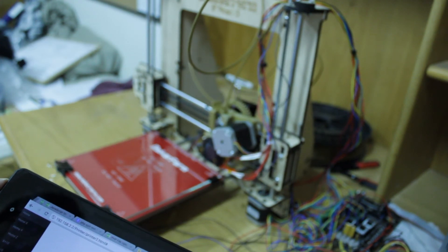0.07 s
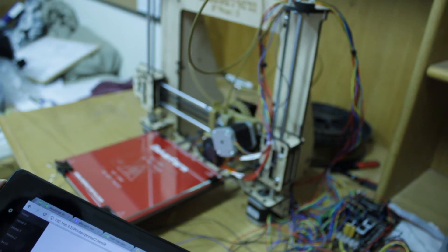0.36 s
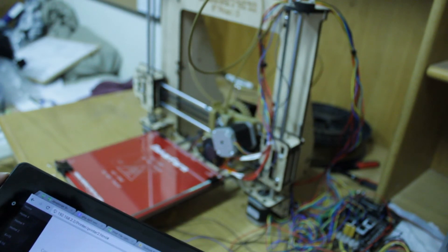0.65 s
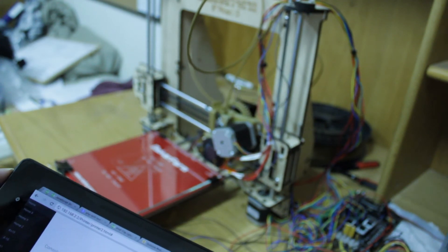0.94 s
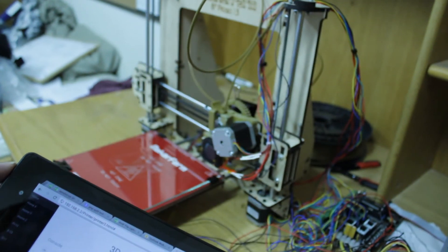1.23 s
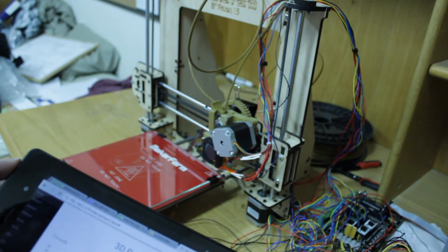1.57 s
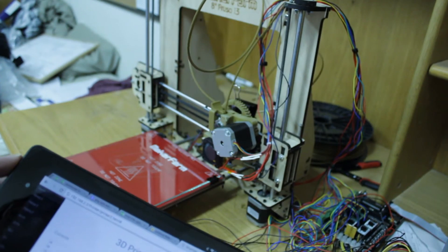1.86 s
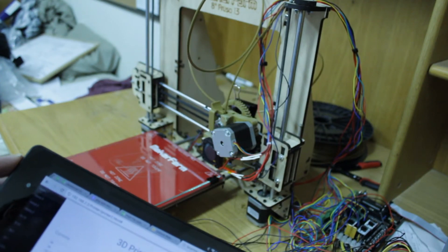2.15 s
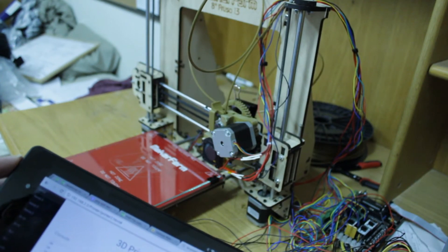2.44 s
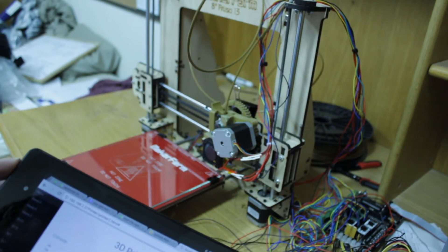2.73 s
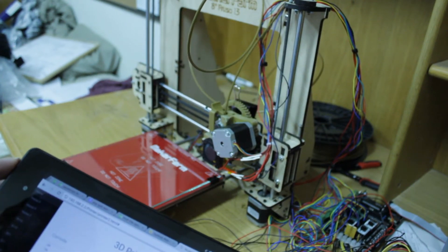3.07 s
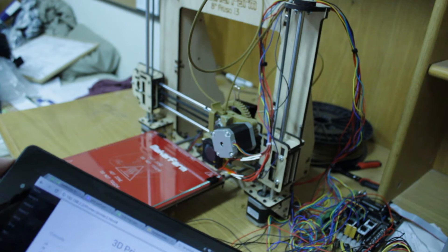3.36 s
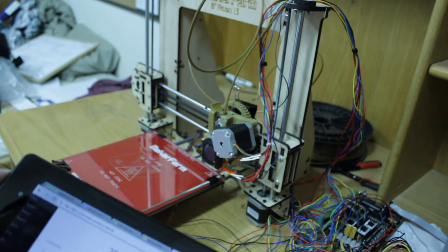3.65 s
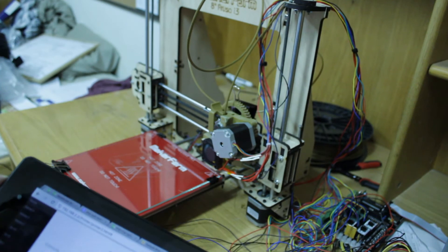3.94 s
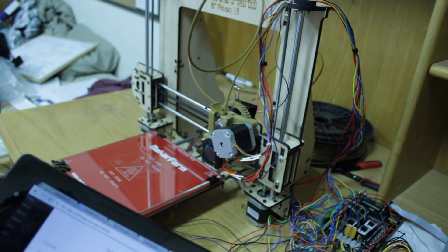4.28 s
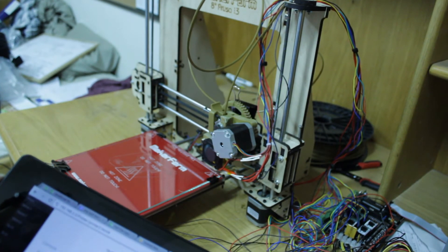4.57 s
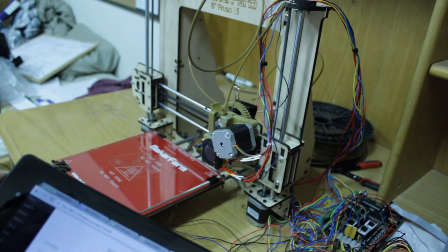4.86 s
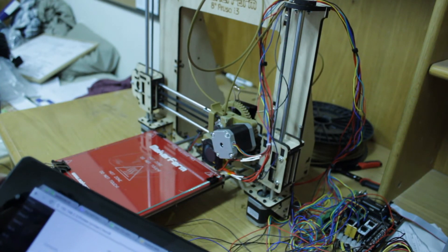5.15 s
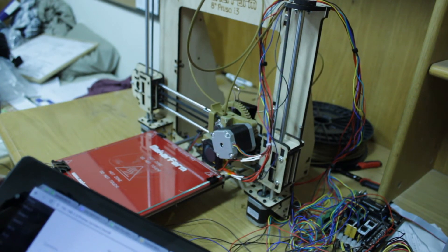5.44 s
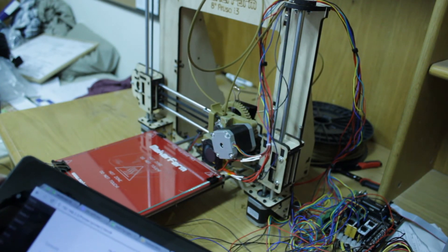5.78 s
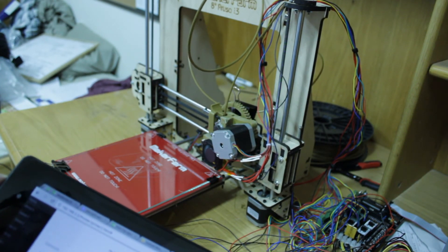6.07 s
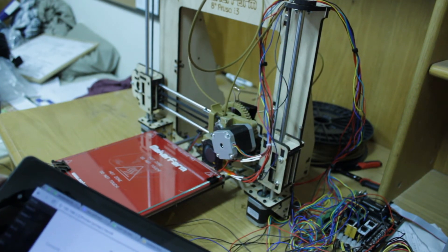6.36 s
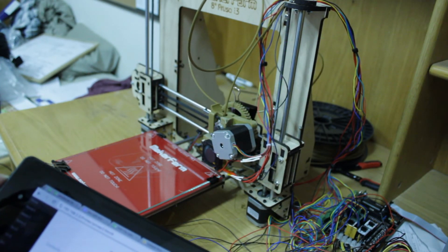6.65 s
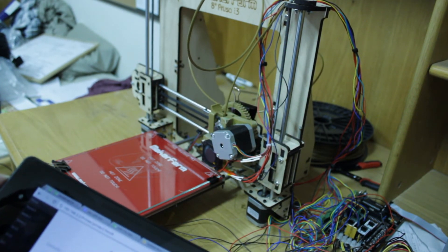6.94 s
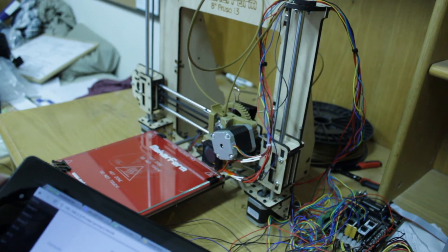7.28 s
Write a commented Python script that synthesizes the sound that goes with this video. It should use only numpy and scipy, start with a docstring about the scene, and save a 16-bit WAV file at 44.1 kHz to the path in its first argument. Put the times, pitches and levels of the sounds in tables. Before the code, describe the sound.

A small 3D printer runs on a desk in a still room, at arm's length from the microphone. Its stepper motor whines at one unchanging pitch, rich in overtones, with a soft rumble of bearings beneath. A little cooling fan adds a high, pulsing chirr. About a second in come a few light ticks, a small knock and brief scuffs. Faint hum and thin electrical hiss lie behind it all.

```python
"""A small 3D printer on a desk in a still room, at arm's length from one microphone.
Its stepper motor drives the bed at one even speed and whines through the wooden frame.
Bearings rumble along the rods, and a little cooling fan rubs once a turn and chirrs.
A few light ticks and short scuffs sound as the bed travels.
Behind it all lie room air, a low hum and a thin, buzzing electrical hiss."""
import sys
import numpy as np
from scipy.fft import rfft, irfft, next_fast_len
from scipy.io import wavfile
from scipy.ndimage import uniform_filter1d, map_coordinates

SR = 44100
rng = np.random.default_rng(int(sys.argv[2]) if len(sys.argv) > 2 else 0)


def transcribe(signal):
    """Save signal, clipped to [-1, 1], as a 16-bit WAV file at the path in sys.argv[1]."""
    frames = np.atleast_2d(signal).T
    limited = np.clip(frames, -1, 1)
    pcm = np.round(limited * 32767).astype(np.int16)
    wavfile.write(sys.argv[1], SR, pcm)


N = 322371

STEP_HZ, FAN_HZ, BUZZ_HZ, TOP_HZ = 208.01, 105.78, 48.01, 15730

# the rods run a little rougher at first: t/s, relative level/dB
ROD_DRAG = [(0, 1), (1.5, -0.5), (7.31, -0.94)]
# the thin treble: t/s, relative level of the coil sizzle/dB, level of the whistling hiss/dB
TREBLE_LEVELS = [(0, -64, -65), (.35, -72, -67), (.8, -70, -67), (1.1, -61, -70), (2.6, -62, -78),
                 (3.2, -64, -68), (3.9, -63, -65), (5.5, -63, -63.5), (7.31, -64, -63.5)]


def stepper():
    """Evenly timed steps jerk the rotor: low orders make one push a step, high ones flutter with load."""
    # overtones of the whine: multiple of the step rate, relative level/dB
    step_orders = [(3, -9.5), (4, -18.5), (5, -17), (6, -27.5), (7, -25.5), (8, -32.5), (9, -30.5),
                   (10, -30), (11, -35.5), (12, -36), (13, -42), (14, -42), (15, -40.5), (16, -54),
                   (17, -54)]
    # the four steps of a coil cycle are unequal: multiple of the step rate, relative level/dB
    coil_orders = [(1 / 4, -63), (3 / 4, -58), (5 / 4, -55), (3 / 2, -43), (5 / 2, -57), (15 / 2, -63),
                   (21 / 2, -62)]
    # the load lifts the two lowest orders: base level/dB, start t/s, attack/s, hold/s, release/s
    first_swell = (-21.5, .325, .44, .425, .11)
    second_swell = (-26.4, .35, .17, .58, .23)
    # depth of that swell as the bed travels: t/s, first order/dB, second order/dB
    swell_depths = [(0, .8, 2.2), (.8, 1.7, 3.6), (1.7, 2.1, 4.6), (2.25, .4, 4.1), (2.53, 4.6, 6),
                    (2.75, .8, 1.9), (3.4, 1.4, 4.3), (3.95, 3.6, 2.3), (4.3, 1.6, 3), (4.9, 4.5, 2.3),
                    (6.05, 4.5, 3.1), (6.6, 6, 4.5), (7.31, 4.8, 1.4)]
    steps = STEP_HZ * clock() + 0.0015 * wobble(3.2)
    first_db, second_db = curves(swell_depths)
    drag_db, = curves(ROD_DRAG)
    lag = 0.08  # cycles by which the frame delays the overtones
    whine = pulley_load(first_swell, first_db) * tone(steps)
    whine += pulley_load(second_swell, second_db) * tone(2 * steps - lag)
    for order, db in step_orders:
        flutter_db = min(0.11 * order, 2.0) * unit(wobble(25) + 0.91 * wobble(2.96))
        phase = rng.random() * (order > 3)
        rough_db = (drag_db + 0.16) * (order > 5)
        whine += amp(db - 18.5 + flutter_db + rough_db) * tone(order * steps - lag + phase)
    uneven_db = -3.5 + .65 * clock()  # the uneven steps sound more as the bed travels
    for order, db in coil_orders:
        whine += amp(db + uneven_db + 0.89 * wobble(3.7)) * tone(order * steps + rng.random())
    return whine


def pulley_load(shape, depth_db):
    """Gain of a low step order: the load swells and slackens once a turn of the belt pulley."""
    level_db, start_s, attack, hold, release = shape
    turn_s, slack_share = 0.97, .3  # when slack, the whine sinks by this share of the depth
    since = (clock() - start_s) % turn_s
    swell = np.interp(since, np.cumsum([0, attack, hold, release]), [0, 1, 1, 0])
    swell = uniform_filter1d(swell, SR // 20)
    return amp(level_db + depth_db * (swell - slack_share) + .3 * wobble(7))


def bearings():
    """Balls roll along the rods, are shaken at each step and stir the frame."""
    # balls on the rods: f/Hz, density/(dB per Hz)
    rolling_spectrum = [(140, -95), (195, -61.5), (255, -66), (300, -55.5), (350, -62.5), (395, -62),
                        (520, -70.5), (1150, -72), (1400, -74), (2180, -78.5), (2650, -82), (4150, -81.5),
                        (6600, -94), (11000, -110)]
    # resonances of the wooden frame: f/Hz, width/Hz, gain/dB
    frame_modes = [(656, 13, 3), (737, 15, -3), (1520, 58, -0.5), (1856, 120, -4), (2145, 150, -0.5),
                   (4040, 160, -15)]
    drag_db, = curves(ROD_DRAG)
    shake = gate(STEP_HZ * clock(), sharpness=0.045)
    rolling = noise(rolling_spectrum) * shake
    rolling *= amp(.4 * drag_db + 0.52 * wobble(30) + 0.41 * wobble(4.12))
    return rolling + resonate(rolling, frame_modes)


def fan():
    """The bearing rubs once a turn and rings the housing; the coils switch four times a turn and sizzle."""
    # fan housing, lower and upper mode: f/Hz, width/Hz, gain/dB (evened out below)
    housing_modes = [(4583, 140, 13), (4767, 190, 0)]
    # its thin rim: f/Hz, width/Hz, relative gain/dB
    rim_modes = [(4960, 110, 0), (5190, 100, -4), (5700, 360, -4)]
    turns = FAN_HZ * clock() + .02 * wobble(1.5) + .002 * wobble(25)
    chirr_db = chirr_level()
    rub = unit(pulses(turns, scatter_db=1.2)) + .35 * rng.standard_normal(N)
    lower, upper = [unit(resonate(resonate(rub, [mode]), [mode])) for mode in housing_modes]
    swell = unit(chirr_db - uniform_filter1d(chirr_db, SR // 2))
    rising = unit(uniform_filter1d(np.gradient(chirr_db), SR // 10))
    balance = np.tanh(.6 * swell + .3 * rising)
    # the lower mode leads as a swell builds, the upper one as it fades
    chirr = (1 + .6 * balance) * lower - (1 - .25 * balance) * upper
    rim = resonate(resonate(rub, rim_modes), [(5000, 1200, 0)])
    rim *= amp(1.5 * swell + .7 * wobble(5))
    rim_db = -62 + .8 * clock()  # the rim rings more as the fan runs on
    switching = pulses(4 * turns, scatter_db=2)
    sizzle = resonate(switching, [(11840, 640, 15), (10800, 500, 11)])
    sizzle = resonate(sizzle, [(11300, 2700, 0)])
    sizzle_db, _ = curves(TREBLE_LEVELS)
    return amp(chirr_db) * unit(chirr) + amp(rim_db) * unit(rim) + amp(sizzle_db + 1.5) * unit(sizzle)


def chirr_level():
    """Level of the fan's chirr in dB: it swells and dips about three and a half times a second."""
    # rate of the swells: t/s, f/Hz
    swell_rates = [(0, 3.3), (1.1, 3.38), (1.3, 3.82), (2.1, 3.83), (3.1, 3.63), (4, 3.5), (5.5, 3.49),
                   (7.31, 3.38)]
    # the chirr at the top of a swell: t/s, level/dB
    crest_levels = [(0, -45), (.3, -43.9), (.95, -44.2), (1.5, -46.7), (2.3, -47.8), (3.02, -46.4),
                    (3.2, -52), (3.36, -46.5), (3.9, -48), (4.4, -46.5), (4.88, -48.5), (5.1, -45.8),
                    (5.35, -45.6), (5.8, -47.2), (6.35, -47.5), (6.75, -45.6), (6.95, -49.3), (7.15, -46.2)]
    swell_hz, = curves(swell_rates)
    crest_db, = curves(crest_levels)
    dip_db, flutter_db, brevity = 3.0, .7, 1.7
    cycles = np.cumsum(swell_hz) / SR
    dip = np.exp(-brevity * (1 + np.cos(2 * np.pi * cycles)))
    return crest_db - dip_db * dip + flutter_db * wobble(16)


def ticks():
    """Each contact is a brief bright crack, and a hard one also knocks the bed."""
    # light contacts: t/s, relative click level/dB, relative knock level/dB, bright band f/Hz, width/Hz
    contacts = [(.9692, -28, -50, 5200, 3000), (.9722, -22.5, -43, 6000, 7000),
                (1.008, -32, -12, 5500, 5000), (1.2545, -38, -76, 9400, 1000),
                (2.2395, -35, -70, 7700, 1100), (3.834, -34, -70, 2950, 120)]
    # what a click rings in the hard small parts: f/Hz, width/Hz, relative gain/dB
    part_modes = [(2420, 830, 11), (3900, 1200, 2), (5300, 630, 4), (7700, 1300, -10), (9600, 1000, -5),
                  (11300, 1100, 7), (13500, 1600, 4)]
    # what a knock rings in the bed: f/Hz, relative level/dB, t60/s
    bed_modes = [(563, 2.5, 0.034), (683, -20, 0.028), (790, -3, 0.032), (866, 1, 0.037),
                 (1010, 1.5, 0.022), (1255, 4, 0.015), (2170, -9, .03)]
    out, t = np.zeros(N), np.arange(SR // 5) / SR
    decay = amp(-60 * t / 0.0058) + 0.058 * amp(-60 * t / 0.088)  # a crack and a faint tail
    for s, click_db, knock_db, bright_hz, width_hz in contacts:
        blow = np.zeros(N)
        blow[:len(t)] = rng.standard_normal(len(t)) * decay
        click = resonate(resonate(blow, part_modes), [(bright_hz, width_hz, 0)])[:len(t)]
        click *= 7 / np.linalg.norm(click)
        knock = sum(amp(db - 60 * t / t60) * np.sin(2 * np.pi * (hz * t + rng.random()))
                    for hz, db, t60 in bed_modes)
        knock *= 0.35 * (1 - np.exp(-t / 0.00061))
        out[round(s * SR):][:len(t)] += amp(click_db) * click + amp(knock_db) * knock
    return out


def scuffs():
    """Something drags lightly on the moving bed, in small grains."""
    # short strokes: centre t/s, half-length/s, level/dB
    strokes = [(1.02, 0.029, -41), (1.21, .025, -44.5), (1.248, .03, -44), (1.3, 0.025, -43)]
    # colour of the friction: f/Hz, relative density/dB
    friction_spectrum = [(1000, -25), (3000, 2), (4300, 6), (5600, 2), (7000, -14), (9300, -7),
                         (11000, -21), (15000, -19)]
    envelope = sum(amp(db) * np.exp(-((clock() - s) / half_s) ** 2) for s, half_s, db in strokes)
    grains = noise(friction_spectrum) * amp(3 * wobble(300))
    return envelope * unit(grains)


def background():
    """The room tone under the printer: still air, hum and an electrical hiss that buzzes."""
    # mains and fan hum: f/Hz, level/dB
    hum_lines = [(59.5, -61.5), (105.9, -45.5), (120, -57), (317.5, -53), (952.4, -66), (1322, -83)]
    # electrical hiss: f/Hz, density/(dB per Hz)
    hiss_spectrum = [(5000, -125), (10000, -103), (12800, -90), (13300, -96), (13900, -91), (14400, -101),
                     (15700, -99)]
    # its narrow whistling bands: f/Hz, relative density/dB
    whistle_spectrum = [(13250, -30), (13440, -3), (13650, -22), (13880, 0), (14100, 0), (14350, -25)]
    # still room: f/Hz, density/(dB per Hz)
    air_spectrum = [(20, -92), (54, -75), (85, -97), (112, -65.5), (135, -76), (1000, -83), (7500, -93),
                    (9500, -95.5), (15500, -96.5)]
    hum = sum(amp(db + wobble(3.13)) * tone(hz * clock() + 0.063 * wobble(4.1) + rng.random())
              for hz, db in hum_lines)
    _, whistle_db = curves(TREBLE_LEVELS)
    hiss = noise(hiss_spectrum) + amp(whistle_db) * unit(noise(whistle_spectrum))
    return noise(air_spectrum) + hum + hiss * gate(BUZZ_HZ * clock(), sharpness=.4)


def amp(db):
    """Decibels to gain."""
    return 10 ** (np.asarray(db) / 20)


def unit(x):
    """Scale to rms 1."""
    return x / np.sqrt(np.mean(x ** 2) + 1e-20)


def clock():
    """The time of each sample."""
    return np.arange(N) / SR


def curves(rows):
    """One value per sample for each column after the time."""
    times, *columns = np.transpose(rows)
    return [np.interp(clock(), times, column) for column in columns]


def wobble(rate):
    """A smooth random curve, rate knots a second."""
    return map_coordinates(rng.standard_normal(int(N * rate / SR) + 4), [clock() * rate])


def filtered(x, response):
    """x times a complex response of frequency."""
    size = next_fast_len(N + SR // 2)
    return irfft(rfft(x, size) * response(np.fft.rfftfreq(size, 1 / SR)), size)[:N]


def noise(spectrum):
    """Noise shaped by rows of f/Hz, density/(dB per Hz)."""
    hz, db = np.transpose(spectrum)
    white = rng.standard_normal(N) * np.sqrt(SR / 2)
    return filtered(white, lambda f: amp(np.interp(np.log(f + 1), np.log(hz), db)))


def resonate(x, modes):
    """x through resonances given as f/Hz, width/Hz, gain/dB."""
    return filtered(x, lambda f: sum(amp(db) * 1j * f * width / (hz * hz - f * f + 1j * f * width)
                                     for hz, width, db in modes))


def tone(cycles):
    """A cosine of rms 1."""
    return np.sqrt(2) * np.cos(2 * np.pi * cycles)


def gate(cycles, sharpness):
    """A gain of rms 1 that swells once a cycle."""
    return unit(np.exp(sharpness * np.cos(2 * np.pi * cycles)))


def pulses(cycles, scatter_db):
    """One impulse of random size each time the count of cycles passes a whole number."""
    at = np.interp(np.arange(np.ceil(cycles[0]), cycles[-1]), cycles, np.arange(N))
    index = at.astype(int)[:, None] + np.arange(-7, 9)
    offset = index - at[:, None]
    shape = np.sinc(offset) * np.cos(np.pi * offset / 16) ** 2  # lets a pulse fall between samples
    sizes = amp(scatter_db * rng.standard_normal((len(at), 1)))
    return np.bincount(np.clip(index, 0, N - 1).ravel(), (shape * sizes).ravel(), N)


def scene():
    """The printer on its desk from an arm's length, in mono."""
    return (stepper() + bearings() + fan() + background() + ticks() + scuffs())[None]


def record(dry):
    """The microphone channel keeps nothing above its band limit."""
    return filtered(dry[0], lambda hz: hz < TOP_HZ)[None]


dry = scene()
out = record(dry)
transcribe(out)
```